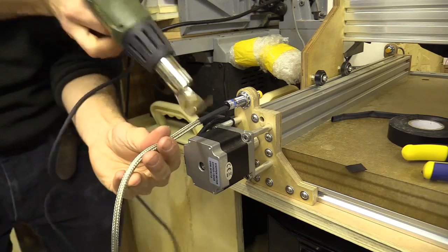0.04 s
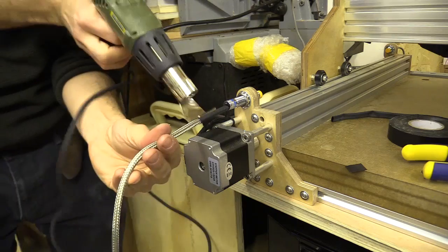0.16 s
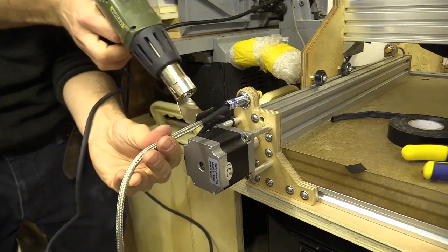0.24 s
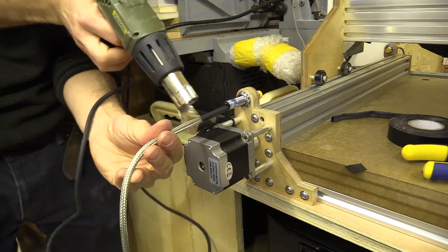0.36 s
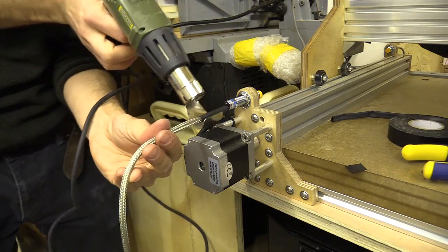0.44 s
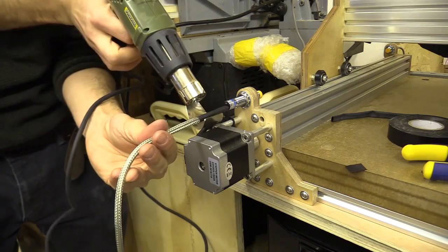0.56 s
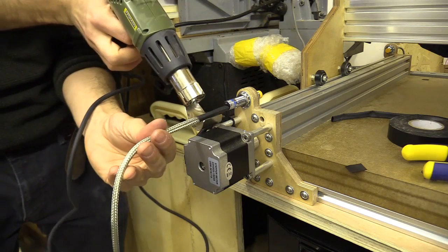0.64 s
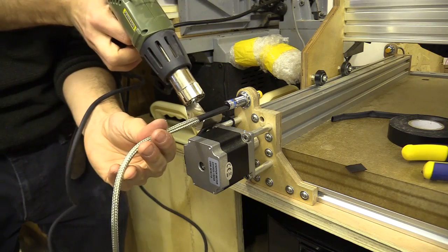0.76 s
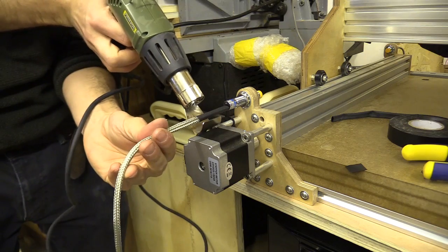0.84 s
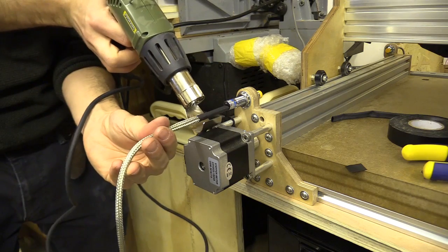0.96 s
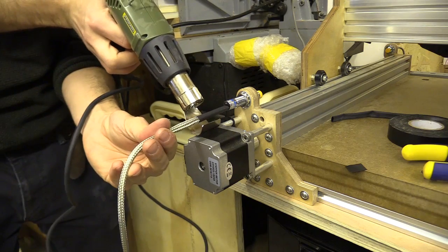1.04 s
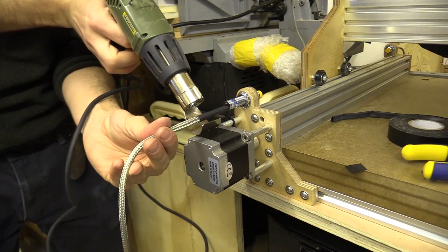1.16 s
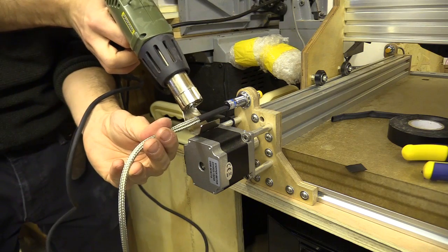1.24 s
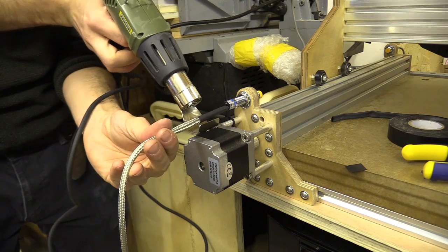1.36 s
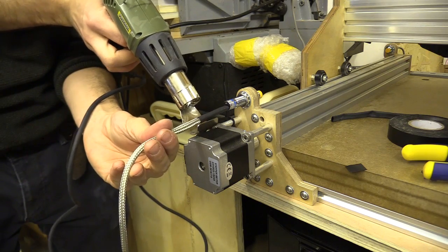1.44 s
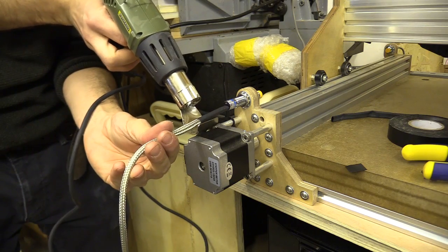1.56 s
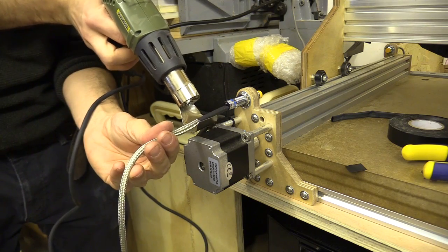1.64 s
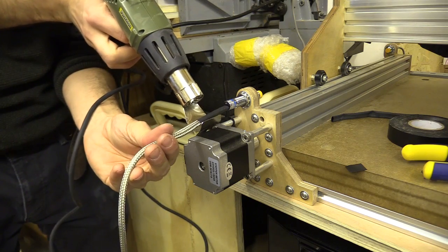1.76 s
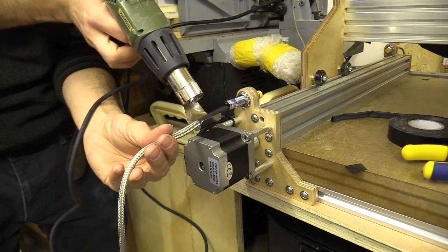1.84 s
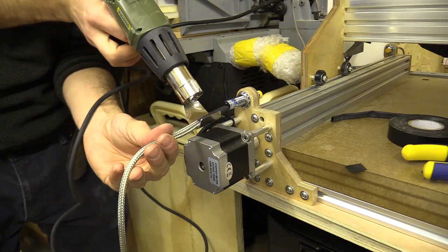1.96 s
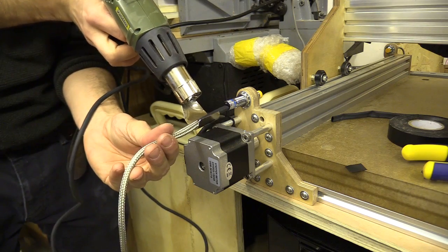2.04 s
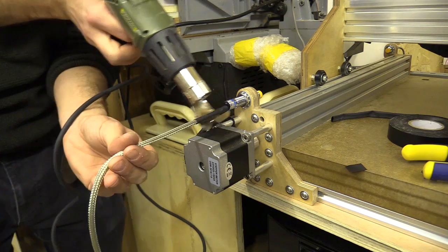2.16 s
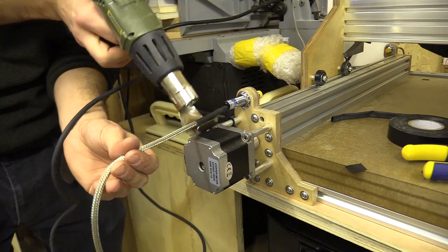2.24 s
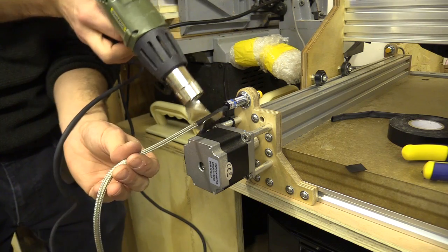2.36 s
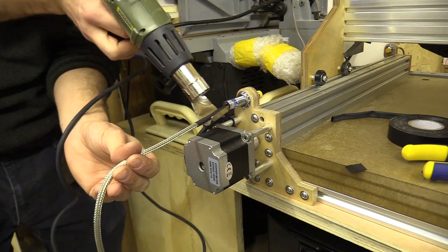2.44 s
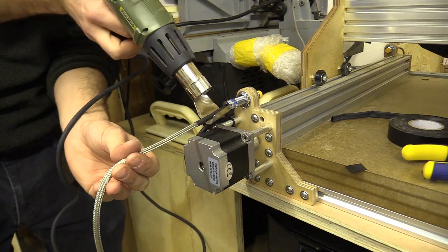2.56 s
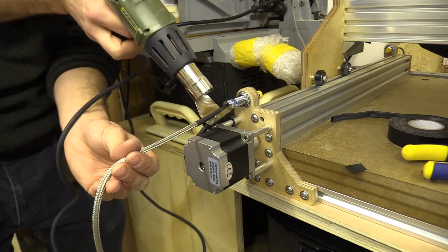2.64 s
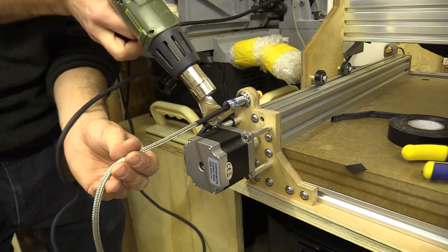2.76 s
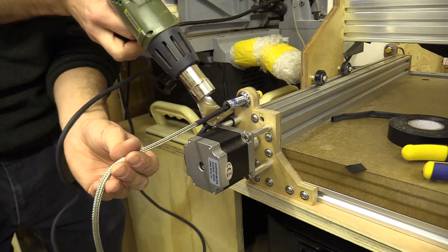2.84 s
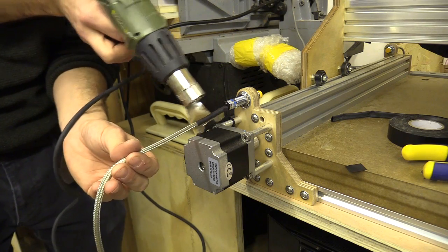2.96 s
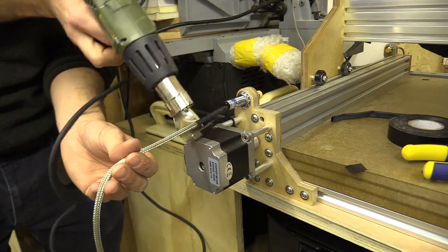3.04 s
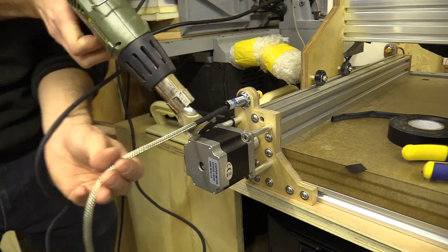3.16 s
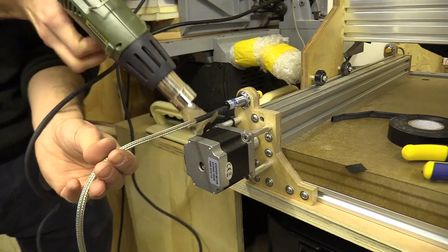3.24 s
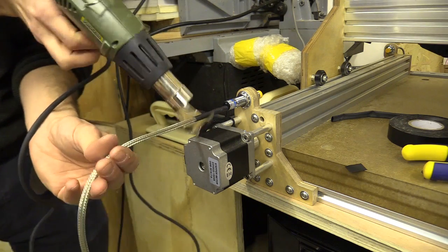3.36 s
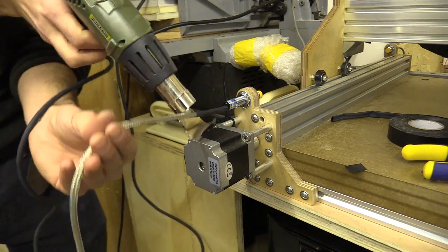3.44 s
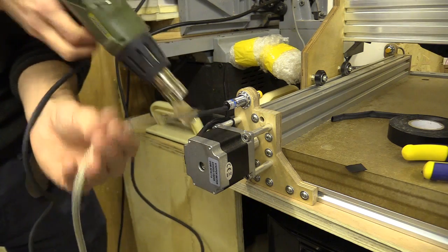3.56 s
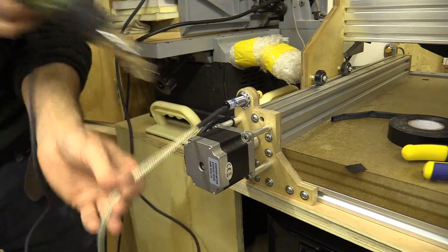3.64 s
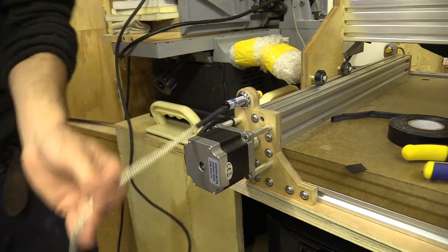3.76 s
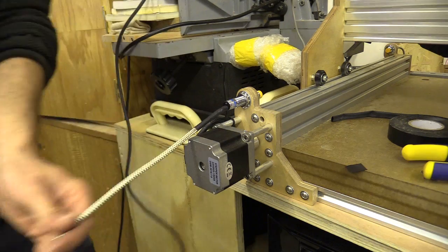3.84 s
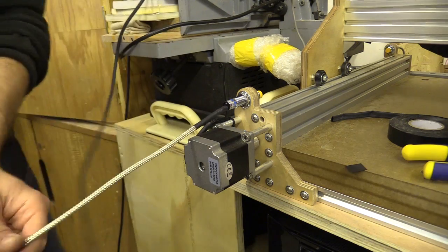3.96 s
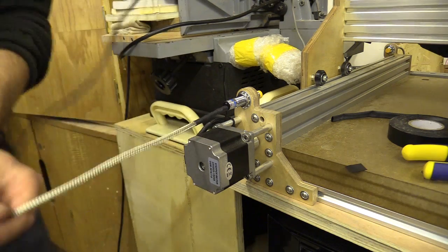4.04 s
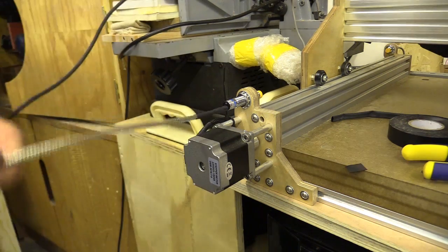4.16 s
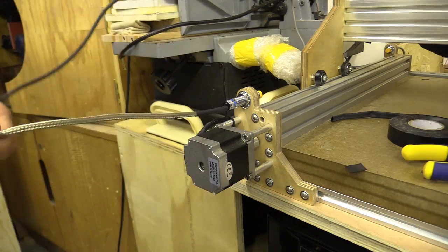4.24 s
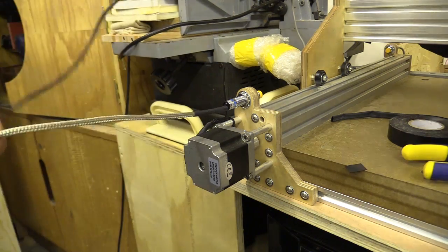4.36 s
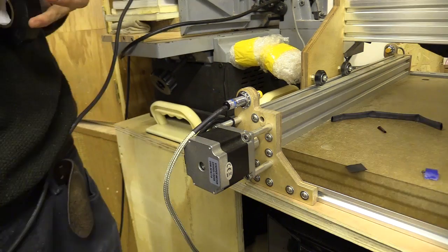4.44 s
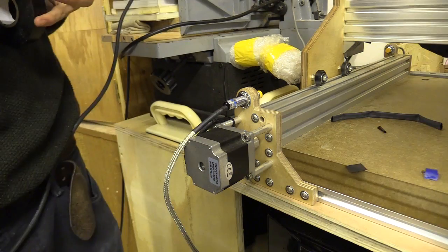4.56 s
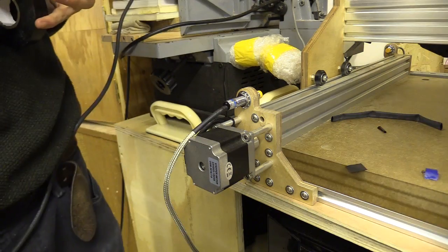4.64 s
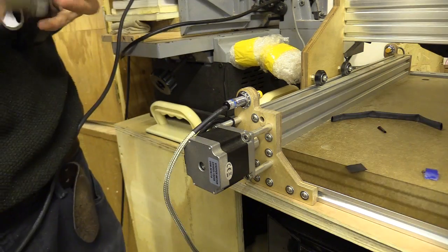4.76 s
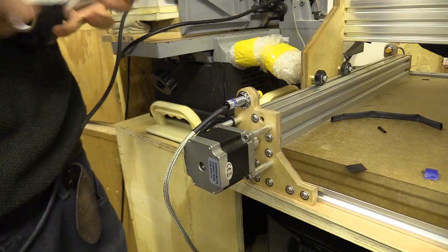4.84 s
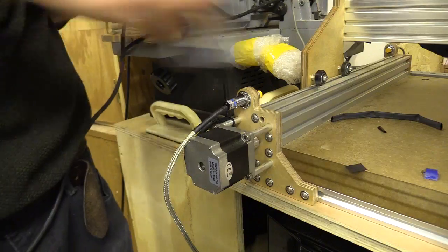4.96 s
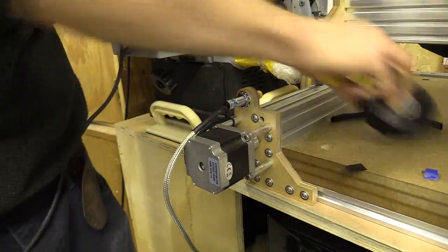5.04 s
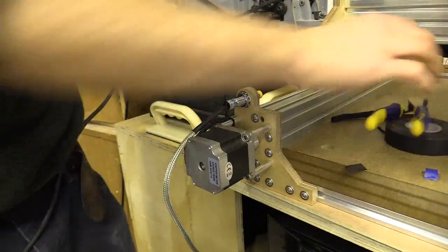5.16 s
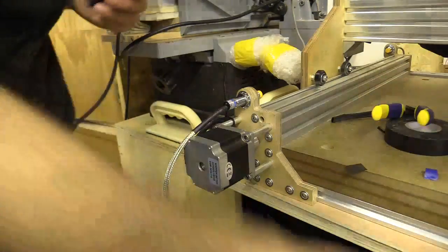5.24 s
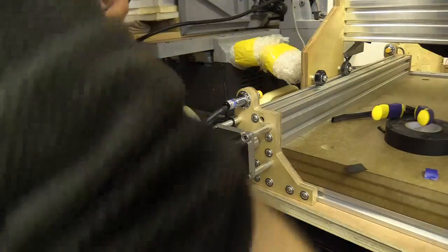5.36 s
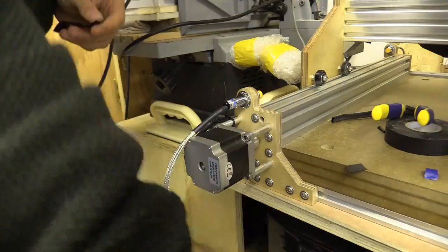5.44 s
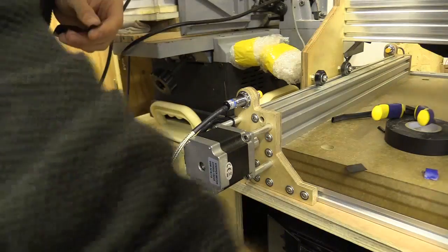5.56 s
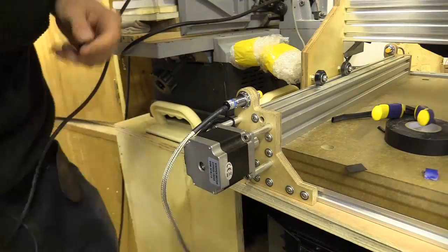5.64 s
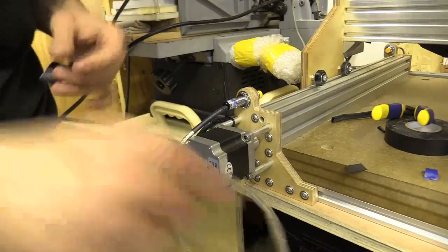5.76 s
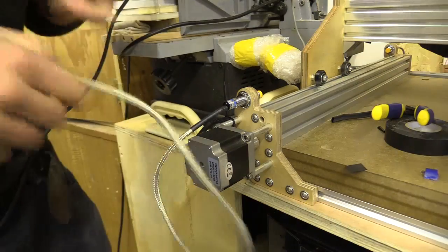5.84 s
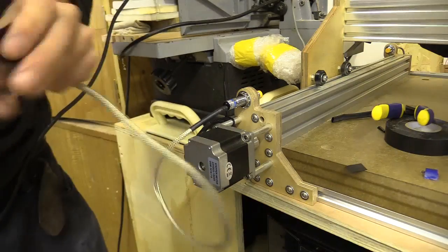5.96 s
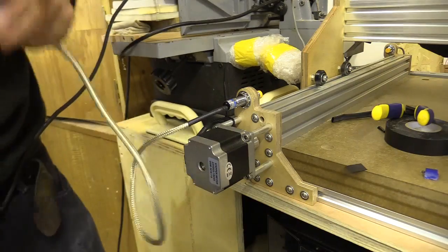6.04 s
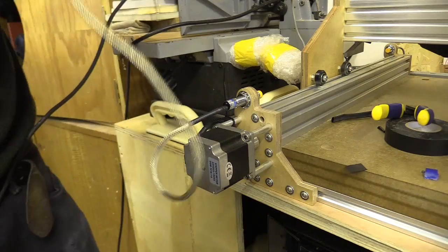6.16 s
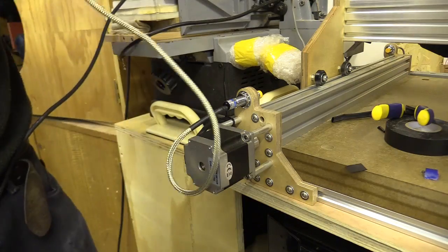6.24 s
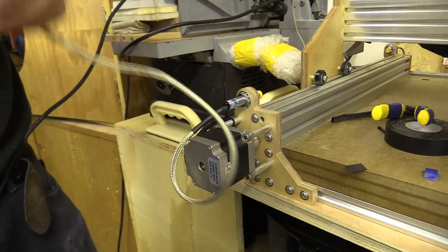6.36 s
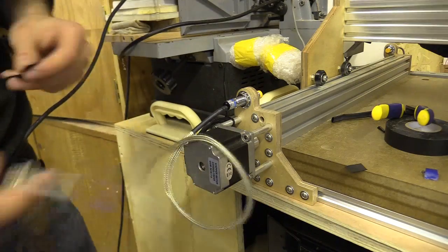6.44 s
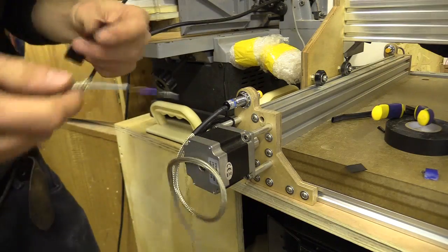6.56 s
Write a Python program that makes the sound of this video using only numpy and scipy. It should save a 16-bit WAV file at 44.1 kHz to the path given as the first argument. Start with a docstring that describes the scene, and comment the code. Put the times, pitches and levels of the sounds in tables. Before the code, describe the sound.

A quiet small workshop with faint low background noise and slight cloth rustle. At 0.2 s a sharp plastic switch snaps and a close heat gun spins up within a fraction of a second, strongest at the start, into a loud steady whine: a tone near 1 kHz with piercing higher overtones and rushing air. Soft buffeting flutters where the jet hits the cable. At 2.2 s the pitch steps up minutely and the air gets brighter. At 3.3 s it is switched off and glides down, dying by about 4 s, with clicks and a tiny squeak around 3.5. Dull wooden bumps and braid rustle come at 4.0-4.4, then a crisp snap at 4.75. At 5.15-5.3 a hand tool clatters hard and bright onto the wooden bed; a duller, more distant rattle follows at 5.4. Scuffing, low bumps at 5.6 and 5.8, and light cable rustles and small knocks continue until 6.6.

```python
"""A heat gun close by is switched on, shrinks a sleeve on a cable for three seconds and coasts to a stop.
Its whine is a stack of sine tones tied to the fan's speed, its rush of air is filtered noise; midway the
pitch steps up and the air gets brighter. As the gun is put down, the braided cable rustles (noise in short
strokes) and a tone squeaks. A hand tool clatters onto the wooden bed of a machine and a few knocks follow:
noise cracks with fading sine tones. A small workshop adds its echo and a quiet background noise."""
import sys
import numpy as np
from scipy import signal
from scipy.fft import rfft, irfft
from scipy.io import wavfile
from scipy.ndimage import uniform_filter1d, minimum_filter1d

SR = 44100
rng = np.random.default_rng(int(sys.argv[2]) if len(sys.argv) > 2 else 0)


def inscribe(sig):
    """Save sig as 16-bit PCM at rate SR to the path in sys.argv[1].

    A 1-D sig is mono; a 2-D sig holds one channel per row.
    Samples are clipped to [-1, 1] before scaling.
    """
    pcm = np.round(np.clip(np.atleast_2d(sig).T, -1, 1) * 32767)
    wavfile.write(sys.argv[1], SR, pcm.astype(np.int16))


N = 290619
TIME = np.arange(N) / SR  # seconds
EDGE_HZ = 15850  # cutoff of the steep treble filter in Hz
SWITCH_ON, SWITCH_OFF, STEP = .2148, 3.338, 2.18  # seconds; at STEP the pitch steps up, the air gets brighter


def amp(db):
    """Turns decibels into a gain."""
    return 10 ** (np.asarray(db) / 20)


def unit(x):
    """Scales a signal to an rms (average strength) of one."""
    return x / np.sqrt(np.mean(x ** 2) + 1e-20)


def level(rows, order=1, fade=0.036):
    """Gain over time from one dB column of a curve, fading to silence outside it within fade seconds."""
    rows = np.asarray(rows)
    s = rows[:, 0]
    inside = np.clip(np.minimum(TIME - s[0], s[-1] - TIME) / fade + 1, 0, 1)
    return inside * amp(np.interp(TIME, s, rows[:, order]))


def noise(points, order=1, band=(0, SR)):
    """Noise whose spectrum follows points of Hz and dB, with an rms of one within the band in Hz."""
    points = np.asarray(points)
    hz = np.fft.rfftfreq(N, 1 / SR)
    curve = np.interp(np.log(hz + 1), np.log(points[:, 0]), points[:, order])
    spectrum = rfft(rng.standard_normal(N)) * amp(curve)
    in_band = (hz >= band[0]) * (hz <= band[1])
    return irfft(spectrum, N) / np.std(irfft(spectrum * in_band, N))


def wander(rate):
    """Random drift of unit size with about this many turns a second."""
    knots = rng.standard_normal(8192)
    return unit(np.interp(TIME * rate, np.arange(len(knots)), knots))


def swells(rows, attack, release, order=2):
    """Gain over time of events that rise, hold for their length and die away."""
    power = np.zeros(N)
    for row in rows:
        t = TIME - row[0]
        rise = np.clip(t / attack, 0, 1)
        fall = np.exp(-np.maximum(t - row[1], 0) / release)
        power += (amp(row[order]) * rise * fall) ** 2
    return np.sqrt(power)


def add(mix, s, sound):
    """Adds a sound to the mix at time s in seconds."""
    part = mix[round(s * SR):][:len(sound)]
    part += sound[:len(part)]


def low_cut(x, hz):
    """Takes out the bass, since small stiff things radiate little of it."""
    return signal.sosfilt(signal.butter(3, hz, "high", fs=SR, output="sos"), x)


def strike(blows, modes, rise=.0003, octaves=1., spread_db=2, detune=.01, count=3):
    """Each blow gives a crack at the contact and rings groups of close tones, differently from spot to spot."""
    size = 12288  # samples per blow
    t = np.arange(size) / SR
    f = np.fft.rfftfreq(size, 1 / SR) + 1
    hz, db, t60 = np.repeat(np.transpose(modes), count, axis=1)[:, :, None]
    decay = amp(db) * np.exp(-np.log(1000) * t / t60)
    out = np.zeros(N)
    for s, ring_db, crack_db, crack_hz, crack_t60 in blows:
        spot, shift, sign = rng.standard_normal((3, len(hz), 1))
        strength = np.sign(sign) * amp(spread_db * spot)
        ring = (strength * decay * np.sin(2 * np.pi * hz * (1 + detune * shift) * t)).sum(0)
        # the same energy wherever it lands
        ring *= np.sqrt(np.sum(decay ** 2) / (2 * count) / np.sum(ring ** 2))
        colour = 1 / (1 + (np.log2(f / crack_hz) / octaves) ** 2)
        bass_cut = f / np.hypot(f, crack_hz / 4)
        crack = unit(irfft(rfft(rng.standard_normal(size)) * colour * bass_cut))
        crack *= np.exp(-np.log(1000) * t / crack_t60)
        onset = 1 - np.exp(-t / rise)
        add(out, s, (amp(ring_db) * ring + amp(crack_db) * crack) * onset)
    return out


def room(x):
    """Diffuse echo of the workshop: many random reflections, each band dying at its own speed."""
    # How fast the workshop swallows sound. Each row: frequency in Hz, time to fade by 60 dB in seconds.
    fading = [(100, 0.15), (500, 0.2), (1200, 0.28), (4000, 0.26), (8000, 0.28), (16000, 0.13)]
    # about one sample in ten holds a reflection, after a gap of 4 ms
    taps = rng.choice([-1., 1.], SR) * (rng.random(SR) < .1) * (np.arange(SR) > .004 * SR)
    hz, t, z = signal.stft(taps, SR, nperseg=256)
    f, t60 = np.transpose(fading)
    decay = amp(-60 * t / np.interp(hz, f, t60)[:, None])
    tail = signal.istft(z * decay, SR, nperseg=256)[1]
    return signal.fftconvolve(x, tail / np.linalg.norm(tail))[:N]


def background(db=-58.5):
    """The quiet of the workshop: steady noise, strongest in the low and middle range."""
    # Colour of the quiet. Each row: frequency in Hz, relative level in dB.
    quiet = [(25, -20), (60, -7), (105, 1.5), (200, -3.5), (330, 2), (520, 1.5), (800, -4.5), (1500, -14.5),
             (4500, -16), (7000, -21), (16000, -25)]
    return amp(db) * noise(quiet)


def rumble():
    """The floor and bench give dully under shifting weight: swells of low noise."""
    # Weight shifts on the floor and the bench. Each row: start in seconds, length in seconds, level in dB.
    shifts = [(3.5, .07, -57), (4.02, 0.063, -45), (4.21, 0.078, -54), (4.33, 0.36, -60),
              (4.48, 0.085, -59), (5.16, 0.29, -47), (5.62, 0.027, -45), (5.82, 0.04, -46),
              (5.92, 0.7, -62), (6.46, 0.043, -54)]
    thud = noise([(25, -31), (45, -17), (66, -5.5), (95, -10), (170, -19.0), (300, -9),
                  (500, -35), (1200, -53.5)])
    return swells(shifts, attack=0.028, release=0.047) * thud


def knock_bumps():
    """Dull bumps against the woodwork, with a soft onset and low, short tones."""
    # Tones of the woodwork. Each row: frequency in Hz, relative level in dB, time to fade by 60 dB in seconds.
    wood = [(65.5, -20, 0.39), (154, -2, 0.12), (210, 5, 0.14), (285, 8, 0.1), (381, 12, 0.06),
            (446, 5, 0.051), (637, 1.5, 0.064)]
    # The bumps. Each row: time in seconds, ring level in dB, crack level in dB, crack centre in Hz,
    # time for the crack to fade by 60 dB in seconds.
    blows = [(4.029, -35.5, -25.5, 650, 0.05), (4.078, -65, -30.5, 3800, 0.018),
             (4.098, -41, -38, 420, 0.077), (4.138, -60, -34, 4000, 0.0084), (4.194, -53, -42, 900, 0.22),
             (4.229, -49, -39.5, 2500, 0.067), (4.295, -53.5, -58, 500, .05), (5.64, -50, -62, 1000, .04),
             (5.821, -41, -58, 400, .03), (5.831, -32.5, -37, 378, 0.045), (6.475, -54, -55, 500, .04)]
    return strike(blows, wood, rise=0.0017, octaves=0.81, spread_db=-0.5, detune=0.026, count=1)


def set_down_rattle():
    """Something hard is set down further off and rattles, ringing what it stands on."""
    # Tones of the shelf. Each row: frequency in Hz, relative level in dB, time to fade by 60 dB in seconds.
    shelf = [(376, -6.5, 0.27), (559, -11, 0.39), (708, 3.5, 0.1), (850, -20, 0.057), (1037, -0.5, 0.085),
             (1200, 9.5, 0.03), (1420, -2, 0.078), (2100, -21, 0.092), (2364, -3, 0.075), (2770, -30, 0.15),
             (3350, -25, 0.084), (3800, -10, 0.081), (4600, -14, 0.083), (5560, -25, .06)]
    # The blows. Each row: time in seconds, ring level in dB, crack level in dB, crack centre in Hz,
    # time for the crack to fade by 60 dB in seconds.
    blows = [(5.416, -28, -19.5, 3500, 0.027), (5.4225, -28, -27, 1810, 0.058),
             (5.441, -29, -29, 2500, 0.044), (5.4555, -34, -32.5, 7060, 0.029),
             (5.471, -33, -31, 3500, .025), (5.894, -54, -42, 1690, 0.054),
             (6.034, -47.5, -47, 2000, 0.044), (6.09, -53, -45.5, 1600, 0.12),
             (6.375, -52, -54, 2000, 0.023), (6.531, -42.5, -47, 1300, 0.027)]
    return low_cut(strike(blows, shelf, rise=0.00055, octaves=0.83, detune=0.0706), hz=302)


def plastic_clicks():
    """The switch and other small plastic parts snap: bright cracks and very short tones."""
    # Tones of the shell. Each row: frequency in Hz, relative level in dB, time to fade by 60 dB in seconds.
    shell = [(523, -5, 0.014), (845, -4, 0.012), (1240, -10, 0.02), (1600, 1, 0.012), (2190, -1.5, 0.007),
             (3700, -4, .016), (4630, -1, .015), (6560, -9, .011), (9900, -15.5, 0.012)]
    # The snaps. Each row: time in seconds, ring level in dB, crack level in dB, crack centre in Hz,
    # time for the crack to fade by 60 dB in seconds.
    blows = [(.2098, -35, -26.5, 7850, 0.025), (.2224, -34, -4.5, 9200, 0.0058),
             (.241, -37, -27, 2500, 0.016), (3.476, -31, -32, 4500, 0.039), (3.562, -42, -28, 6300, 0.047),
             (3.57, -51, -22, 6550, 0.034), (3.782, -45, -35.5, 1730, 0.037),
             (4.7578, -24.5, -18, 3060, 0.01), (4.781, -63, -43, 13000, .02),
             (4.8495, -69, -43, 11000, 0.027)]
    return low_cut(strike(blows, shell, rise=.0001, octaves=0.99, detune=0.043), hz=300)


def tool_clatter():
    """The hand tool lands on the wooden bed, bounces and settles in a quick run of hard blows."""
    # Tones of the bed. Each row: frequency in Hz, relative level in dB, time to fade by 60 dB in seconds.
    bed = [(618, 3, 0.089), (846, 12, 0.021), (950, -1.5, 0.032), (1203, -5, 0.088), (1450, -4.5, 0.047),
           (1568, -16, 0.09), (2090, -0.5, 0.049), (2325, -10, 0.072), (2900, -23, 0.036),
           (3480, -1, 0.033), (3890, -3.5, 0.018), (4410, -15, 0.059), (4640, -6, 0.028),
           (6320, -19.5, 0.039)]
    # The blows. Each row: time in seconds, ring level in dB, crack level in dB, crack centre in Hz,
    # time for the crack to fade by 60 dB in seconds.
    blows = [(5.1555, -15.5, -15, 2420, 0.009), (5.169, -21, -27, 2500, 0.046),
             (5.174, -19, -21, 3000, 0.019), (5.186, -24, -21, 2000, 0.021),
             (5.1945, -42, -19, 11500, 0.031), (5.1985, -14, 2.5, 4070, 0.015),
             (5.2025, -31, -20, 7000, .012), (5.2095, -24, -24, 11600, 0.045),
             (5.227, -28, -27, 4000, 0.025), (5.2305, -18, -15.5, 4000, 0.037),
             (5.2365, -21.5, -13.5, 4450, 0.018), (5.243, -21, -16, 4040, 0.041),
             (5.254, -19.5, -21, 3370, 0.056), (5.265, -29, -39, 10000, 0.018),
             (5.278, -45, -23, 7240, 0.026), (5.2855, -42, -34, 10000, 0.017),
             (5.291, -31, -29, 6830, 0.058), (5.297, -30, -41, 1800, 0.012),
             (5.3165, -68, -27.5, 7800, 0.0085)]
    return low_cut(strike(blows, bed, rise=0.000069, octaves=0.46, detune=0.017), hz=540)


def handling(grain_db=2.0, attack=0.014, release=0.0067):
    """Cable braid and cloth slide in short strokes, made of small uneven catches."""
    # Cable and clothes sliding. Each row: start in seconds, length in seconds, scuffing level in dB,
    # swishing level in dB.
    strokes = [(0, 0.15, -60.5, -59.5), (3.89, 0.067, -60, -56.5), (3.96, 0.058, -68, -75),
               (4.19, 0.09, -63, -48), (4.26, 0.2, -62.5, -54), (4.335, 0.032, -54, -43.5),
               (4.93, 0.048, -67, -62), (5.005, 0.15, -61, -57.5), (5.47, .1, -45, -66),
               (5.57, 0.16, -45.5, -52.5), (5.6, 0.022, -49, -42), (5.73, 0.356, -56.5, -60),
               (6.18, 0.42, -55.5, -60), (6.22, 0.048, -50.5, -53.5), (6.36, .23, -67, -56.5),
               (6.565, .03, -47, -62)]
    # Colour of the dull scuffing. Each row: frequency in Hz, relative level in dB.
    scuff_colour = [(300, -4.5), (700, -3), (1250, 7.5), (2200, -4.5), (3500, -2.5), (6000, -17.5),
                    (16000, -40.5)]
    # Colour of the bright swishing. Each row: frequency in Hz, relative level in dB.
    swish_colour = [(1500, -19), (3200, -6.5), (4500, 1), (6000, -4.5), (8000, -9.5), (11000, -9),
                    (16000, -16)]
    scuff = swells(strokes, attack, release, order=2) * noise(scuff_colour)
    swish = swells(strokes, attack, release, order=3) * noise(swish_colour)
    catches = unit(amp(grain_db * wander(250)))
    return catches * (scuff + swish)


def squeak(overtone_db=-16, shrill_hz=5480, shrill_db=-28, start=3.558, end=3.574):
    """A brief, mostly rising stick-slip tone with a shrill rasp near its start."""
    # The squeak as the gun is pulled away. Each row: time in seconds, pitch in Hz, level in dB.
    glide = [(3.552, 1090, -51), (3.562, 1165, -41), (3.579, 1170, -30), (3.584, 1340, -38),
             (3.597, 1300, -58)]
    s, hz, _ = np.transpose(glide)
    phase = 2 * np.pi * np.cumsum(np.interp(TIME, s, hz)) / SR
    tone = level(glide, order=2) * (np.sin(phase) + amp(overtone_db) * np.sin(2 * phase))
    rough_hz = shrill_hz * (1 + 0.016 * wander(740))
    shrill = np.sin(2 * np.pi * np.cumsum(rough_hz) / SR)
    return tone + shrill * level([(start, shrill_db), (end, shrill_db)], fade=0.0053)


def hum(hz=250, db=-65):
    """Faint mains hum of the heating element while the gun is on."""
    return amp(db) * np.sin(2 * np.pi * hz * TIME) * level([(SWITCH_ON, 0), (SWITCH_OFF, 0)])


def stepped():
    """0 before the step at 2.18 s, 1 after: the pitch steps up and the air gets brighter."""
    return np.clip((TIME - STEP) / .01 + .5, 0, 1)


def surge(seconds):
    """The starting current: 1 at the switch, dying away."""
    return np.exp(-np.maximum(TIME - SWITCH_ON, 0) / seconds)


def full_rate(warm_hz=1024.8, cold_sag_hz=22, warm_up_s=1.4, step_hz=5.3):
    """Fan blades passing per second under power: creeps up as the motor warms, with one small step up."""
    return warm_hz - cold_sag_hz * np.exp(-TIME / warm_up_s) + step_hz * stepped()


def speed(spin_up_s=.0852, coast_s=.415, friction_hz_per_s=235):
    """Share of full fan speed: the rotor winds up, runs, then coasts against air and brush friction."""
    friction = friction_hz_per_s * coast_s / full_rate()
    coast = np.exp(-np.maximum(TIME - SWITCH_OFF, 0) / coast_s)
    return np.maximum((1 - surge(spin_up_s) + friction) * coast - friction, 0)


def brushes(db=-42, power=1.2, settled_db=-15, slip=0.087, stall=0.26):
    """Strength of the brush buzz: grows with speed, dies near a stall, smooths out once the motor settles."""
    share = speed()
    settled = np.clip(1 - (1 - share) / slip, 0, 1)
    turning = 1 - np.exp(-(share / stall) ** 4)
    return amp(db + settled_db * settled) * share ** power * turning


def brush_hiss(db=1):
    """The brushes rub on the commutator (the rotor's contacts) with a thin hiss of high noise."""
    colour = [(2000, -40), (8000, -22), (11500, -12), (14300, 0), (16000, -2)]  # Hz, dB
    return amp(db) * brushes() * noise(colour)


def air(rush_db=-36.0, step_db=-1.24, power=1.57, surge_db=6, surge_s=0.31, gust_db=1.0, dull_hz=4000,
        brightening=3.9):
    """Turbulent rush from the nozzle, duller at low speed, and the low flutter of the jet on what it meets."""
    # Colour of the air. Each row: frequency in Hz, relative level before the step in dB, after it in dB.
    colour = [(60, -57, -48), (295, -32, -23.5), (770, -21.5, -14), (1250, -20, -14.5), (1770, -12.5, -10),
              (1745, -21, -16.5), (2040, -8, -6.5), (2640, -5, -3.5), (3260, -14.5, -8), (3570, -2.5, -2.5),
              (5360, -5.5, 0), (5710, -4.5, 7), (6220, -11, -6.5), (7046, -6.5, 3), (7730, -18, -11),
              (8140, -9, -2), (8440, -10.5, 0), (9630, -3.5, 0), (10020, -12, -3.5), (11800, -12, -5),
              (14100, -13.5, -10), (15700, -42, -12)]
    # The jet buffets hand and cable. Each row: start in seconds, length in seconds, level in dB.
    buffets = [(.58, .14, -61), (1.47, .03, -71), (1.85, .1, -52), (2.16, .29, -58), (3.02, 0.12, -55.5),
               (3.2, .07, -52), (3.46, 0.062, -48.5)]
    band = (2000, 3900)  # Hz, where the rush is levelled
    after, share = stepped(), speed()
    rush_before = (1 - after) * noise(colour, order=1, band=band)
    rush_after = after * amp(step_db) * noise(colour, order=2, band=band)
    rush = rush_before + rush_after
    dull = signal.sosfilt(signal.butter(1, min(dull_hz, SR / 3), fs=SR, output="sos"), rush)
    rush = dull + (rush - dull) * share ** brightening
    # strongest just after the start
    gain = amp(rush_db + surge_db * surge(surge_s) + gust_db * wander(60)) * share ** power
    flutter = noise([(50, -24), (110, -19), (170, 6), (240, 6.0), (380, -1.5), (650, -7), (2000, -38)])
    return gain * rush + swells(buffets, attack=0.012, release=0.017) * flutter


def housing(hz, base_db=-7, low_hz=2700):
    """Gain of the gun's shell: resonances on a base weak in the bass, rippled by two near reflections."""
    # Resonances that light up each line as it glides past. Each row: frequency in Hz, width in Hz,
    # relative level in dB.
    resonances = [(3850, 530, 5.5), (4750, 190, 10), (5840, 110, 7), (7020, 310, 7), (8430, 370, 8.5),
                  (9000, 350, 6), (11400, 730, 9.5), (13500, 1600, 6), (15200, 1200, 6)]
    peaks = sum(amp(db) ** 2 / (1 + (2 * (hz - f) / width) ** 2) for f, width, db in resonances)
    # reflections 0.8 and 1.98 ms late
    ripple = abs(1 + .4 * np.exp(2j * np.pi * hz * .0008) + .35 * np.exp(2j * np.pi * hz * .00198))
    return ripple * np.sqrt(amp(base_db) ** 2 + peaks) / (1 + (low_hz / hz) ** 2)


def nozzle_ring(hz, ring_hz=2520, width_hz=170, db=-43):
    """Level of a line that sets the metal nozzle ringing as it sweeps through."""
    return amp(db) / (1 + (2 * (hz - ring_hz) / width_hz) ** 2)


def motor(jitter=0.00034, drift_db=1.66, flutter=0.099, main_flutter=0.01, between_db=-10,
          blade_db=-35.0, blade_step_db=-1.5, blade_power=2.9, whine_power=2.54, overtone_power=4.2,
          top_multiple=38.0, strain_db=7, strain_s=0.21):
    """Blade tone, whine and overtones on one shaft; the brushes stress every fifth multiple."""
    # The three loudest lines, which shift as the gun is aimed. Each row: time in seconds,
    # relative level of the 5th multiple in dB, of the 7th in dB, of the 10th in dB.
    whine = [(0.65, -29.5, -39.0, -33), (0.9, -27, -33.5, -35.5), (1.18, -25.5, -33.5, -41.5),
             (1.5, -25.5, -31.5, -34.5), (2.1, -25.0, -31, -34), (2.3, -26.0, -30, -42),
             (2.55, -24.5, -30, -40), (2.85, -26.5, -33.5, -45), (3.05, -26, -32.5, -47),
             (3.22, -29.0, -31.0, -47.5), (3.29, -29.5, -30.5, -33)]
    # The weaker overtones at full speed. Each row: multiple of the blade rate,
    # relative level before the step in dB, after it in dB.
    overtone_rows = [(2, -54, -54), (3, -55, -52.5), (4, -41.5, -42.5), (6, -40, -43), (8, -45, -43.5),
                     (9, -60, -55), (11, -43, -43.5), (12, -40, -51), (13, -43, -42), (14, -46, -45.5),
                     (15, -39, -42)]
    share, full_hz, buzz, after = speed(), full_rate(), brushes(), stepped()
    hz = full_hz * share * (1 + jitter * wander(250))
    phase = 2 * np.pi * np.cumsum(hz) / SR
    strain = amp(strain_db * surge(strain_s))  # extra level from the starting current
    s, *levels = np.transpose(whine)
    strong = {}
    for k, db in zip((5, 7, 10), levels):
        strong[k] = strain * share ** whine_power * amp(np.interp(TIME, s, db))
    strong[1] = amp(blade_db + blade_step_db * after) * share ** blade_power
    strong[10] = strong[10] + nozzle_ring(10 * hz)
    weak = {round(k): (early, late) for k, early, late in overtone_rows}
    overtones = strain * share ** overtone_power
    out = np.zeros(N)
    for k in range(1, 61):
        on = np.flatnonzero((k * hz < EDGE_HZ) & (share > 0))
        between = k % 5 > 0  # not a fifth multiple
        shell = housing(k * hz[on])
        # the whine takes on the colour of the housing as it glides, less so the slower it gets
        glide = 1
        if 1 < k <= max(weak):
            glide = (shell / housing(k * full_hz[on])) ** share[on]
        gain = buzz[on] * amp(between_db * between) * shell / (1 + (k / top_multiple) ** 6)
        if k in strong:
            gain = np.maximum(gain, glide * strong[k][on]) * (1 + main_flutter * wander(200)[on])
        else:
            if k in weak:
                weak_level = amp(np.interp(after[on], [0, 1], weak[k]))
                gain = np.maximum(gain, glide * overtones[on] * weak_level)
            # reflections shift as the hand moves, and turbulence shakes each line
            gain = gain * amp(drift_db * wander(6.07)[on]) * (1 + flutter * wander(220)[on])
        out[on] += gain * np.sin(k * phase[on] + rng.uniform(0, 2 * np.pi))
    return np.sqrt(2) * out


def scene():
    """Gun, handling and knocks over the quiet of the workshop, the same in both channels."""
    clatter, set_down = tool_clatter(), set_down_rattle()
    bumps, clicks = knock_bumps(), plastic_clicks()
    # how strongly each kind of blow excites the room
    echo = room(amp(-25) * clatter + amp(-9) * set_down + amp(-8.5) * bumps + amp(-21.0) * clicks)
    gun = motor() + air() + brush_hiss() + hum()
    moves = squeak() + handling() + rumble()
    knocks = clatter + set_down + bumps + clicks
    return np.tile(gun + moves + knocks + echo + background(), (2, 1))


def record(dry):
    """A fast peak limiter holds the hardest blows under full scale; then a steep filter cuts the top treble."""
    room_left = .95 / np.maximum(abs(dry).max(0), .95)
    gain = uniform_filter1d(minimum_filter1d(room_left, size=90), size=90)  # about 2 ms
    edge = signal.firwin(511, EDGE_HZ, window=("kaiser", 8), fs=SR)
    return signal.oaconvolve(dry * gain, edge[None], "same", axes=1)


dry = scene()
out = record(dry)
inscribe(out)
```